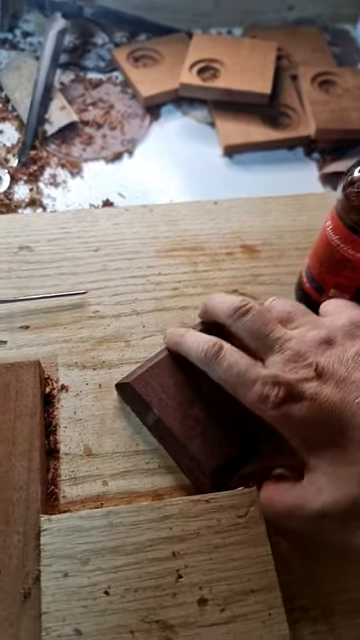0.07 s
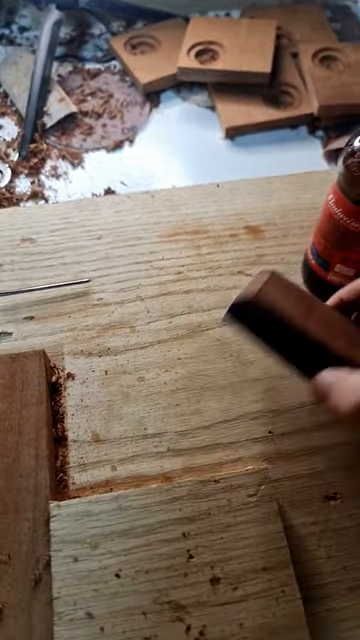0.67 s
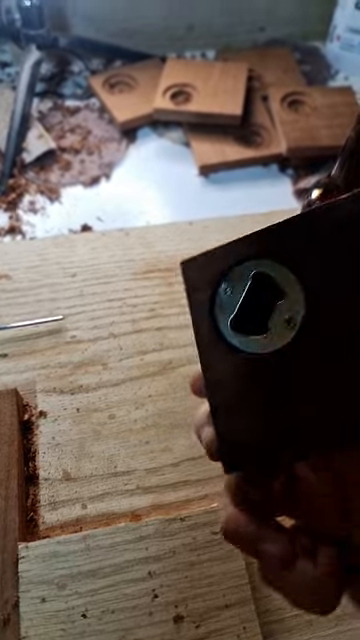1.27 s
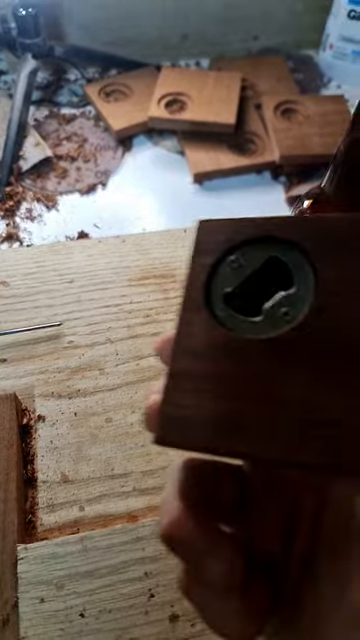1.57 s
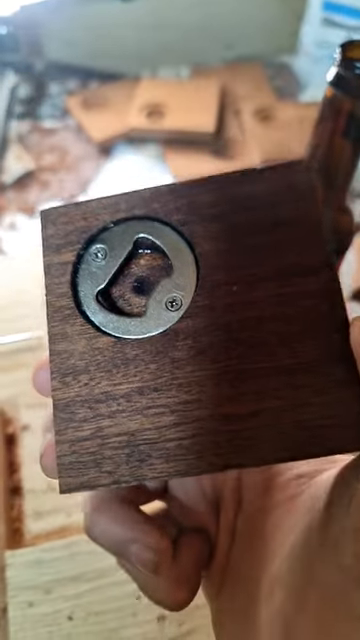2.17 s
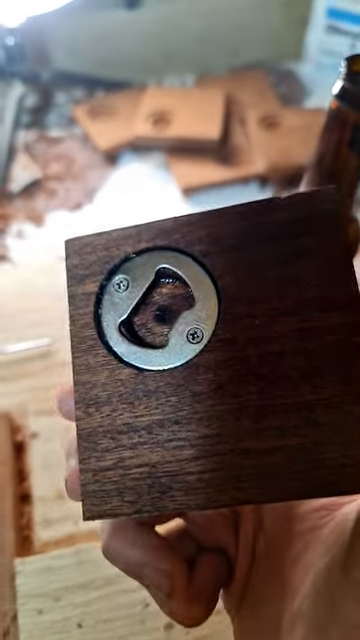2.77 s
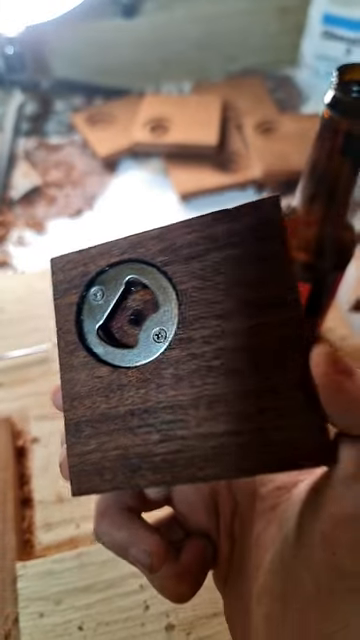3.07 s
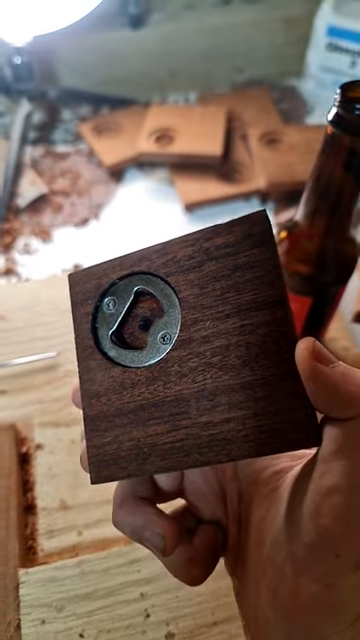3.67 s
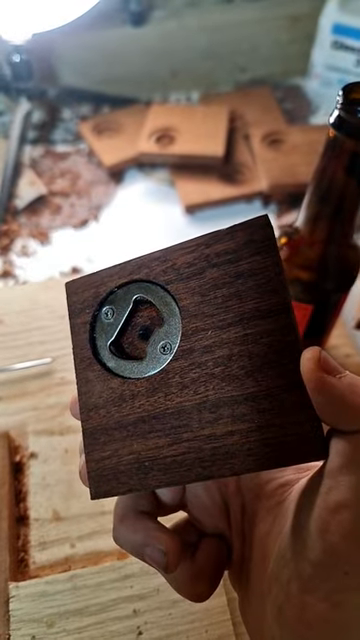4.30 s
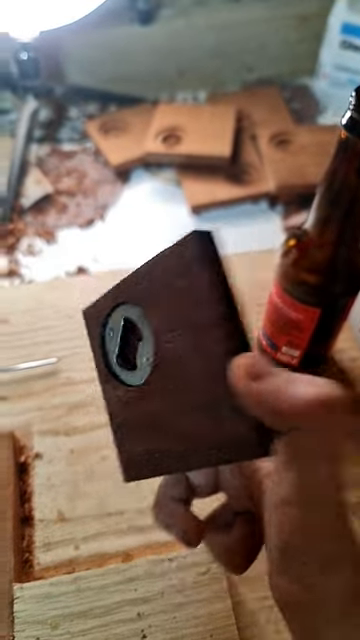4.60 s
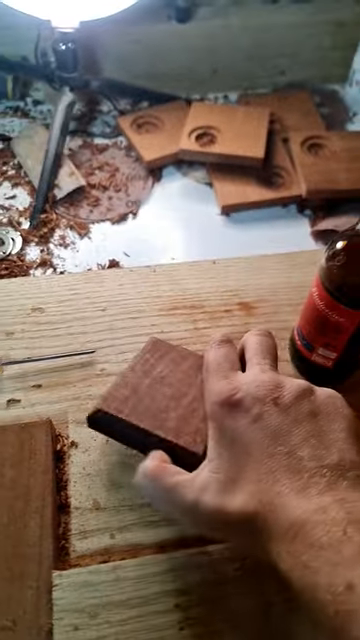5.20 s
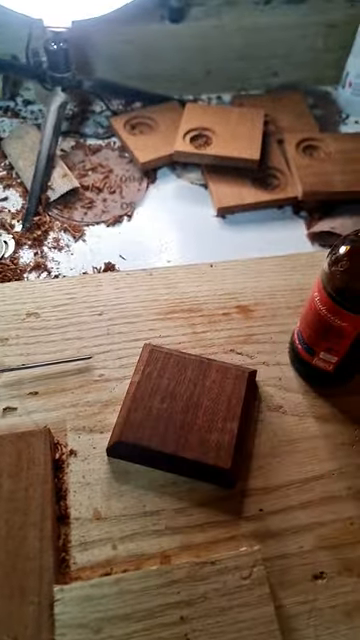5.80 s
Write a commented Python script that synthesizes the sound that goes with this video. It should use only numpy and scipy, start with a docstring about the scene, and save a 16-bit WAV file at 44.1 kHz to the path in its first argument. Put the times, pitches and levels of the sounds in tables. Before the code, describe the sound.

Wood drags briefly on a bench, followed by muffled microphone handling bumps and, near the end, two quick wooden knocks.

```python
"""A gritty scrape comes first: a wooden coaster is dragged over a workbench. It is lifted, turned in
softly brushing fingers and set down edge first with a few clacks. Friction and impact excite the
modes of coaster and bench, which reach a phone's open left port with the small workshop's low rumble.
The hand holding the phone covers the right port, which hears mainly that hand: tremor, soft bumps,
muffled skin rubs and ticks of the case."""
import sys
import numpy as np
from scipy import signal
from scipy.fft import rfft, irfft
from scipy.io import wavfile
from scipy.ndimage import map_coordinates

SR = 44100
rng = np.random.default_rng(int(sys.argv[2]) if len(sys.argv) > 2 else 0)


def store_pcm(level_fs):
    """Save levels as 16-bit WAV."""
    pcm = np.round(np.clip(level_fs, -1, 1) * 32767).astype(np.int16)
    wavfile.write(sys.argv[1], SR, np.atleast_2d(pcm).T)


N = 257984
TIME = np.arange(N) / SR

# modes of the coaster against the bench top: f/Hz, relative level/dB, T60/s
COASTER_MODES = [(599, -10, 0.057), (659, -1, 0.048), (716, 1.5, 0.047), (1017, -3, 0.053),
                 (1152, -0.5, 0.044), (1255, -15, 0.087), (1333, -9.5, 0.09), (1855, -21, 0.065),
                 (2110, -26, 0.062), (3010, -26, 0.1), (3513, -20, 0.067), (5010, -19, 0.1)]
# modes of the heavy bench: f/Hz, relative level/dB, T60/s
BENCH_MODES = [(55.4, 0.5, 0.82), (118, -25, 0.071), (173.4, 5, 0.16), (222.4, -7.5, 0.16),
               (267.7, 4.5, 0.15), (308, 9, 0.083), (393, -3.5, 0.092)]
# shifts of the grip on the phone: t/s, peak level/dB, push length/s
GRIP_SHIFTS = [(0.111, -26.5, 0.007), (0.256, -29.5, 0.0073), (0.293, -29.5, 0.012), (0.383, -29.5, 0.0031),
               (0.635, -30, 0.0066), (1.314, -27.5, 0.0086), (1.409, -23.5, 0.0091), (1.77, -23.5, 0.0046),
               (1.9, -25.5, 0.0081), (2.216, -29.5, 0.0092), (2.288, -26, 0.0078), (5.056, -21.5, 0.0084),
               (5.268, -34, 0.0062), (5.784, -25.5, 0.0031)]


def knocks(crack_t60=0.15, bench_rise_s=0.01, edge_t60=0.013, edge_rise_s=0.00037):
    """Impact excitation: coaster and edge ring, dust is crushed, the heavy bench responds later."""
    # the coaster rocks at pick-up; later it lands on an edge, tips and settles: t/s, clack level/dB,
    # corner f/Hz, bench level/dB, crack level/dB, edge f/Hz, edge level/dB, pitch ratio of the wood
    impacts = [(0.4577, -52, 1200, -62, -45.5, 1150, -37.5, 1),
               (0.4635, -52, 800, -58, -51, 1160, -39, 0.91), (0.5012, -61, 1710, -49.5, -53, 1600, -39, 1),
               (5.1570, -27.5, 1860, -41, -32, 2060, -36.5, 1),
               (5.3271, -29.5, 1045, -52, -40.5, 1770, -33.5, 0.99),
               (5.3479, -55, 1140, -54, -52, 1710, -41.5, 0.91),
               (5.3649, -41.5, 1150, -60, -41, 1570, -41, 0.98),
               (5.3681, -26, 410, -41.5, -51, 1100, -41.5, .85),
               (5.3757, -37.5, 385, -56, -66, 1270, -51, 0.71),
               (5.3885, -32, 225, -55, -62, 800, -50.5, .5),
               (5.3925, -35.5, 270, -46.5, -65, 595, -43, 0.573)]
    # spectrum of wood cracking on dusty wood: f/Hz, relative level/dB
    crack_spectrum = [(100, -8), (300, 13), (420, 6), (600, 13), (1300, 2.5), (1600, -15), (2100, -11.5),
                      (2600, -16), (3400, -17), (4300, -24), (8000, -21.5), (10000, -36), (16000, -37)]
    out, t = np.zeros(N), TIME[:SR // 2]
    bench = ring(BENCH_MODES) * (1 - np.exp(-t / bench_rise_s))
    for s, clack_db, corner_hz, bench_db, crack_db, edge_hz, edge_db, pitch in impacts:
        wood = ring([(hz * pitch, db, t60) for hz, db, t60 in COASTER_MODES], together=True)
        clack = lowpass(wood, corner_hz)  # a flatter, softer contact reaches fewer high modes
        add(out, s, undb(clack_db) * clack + undb(bench_db) * bench)
        add(out, s, ring([(edge_hz, edge_db, edge_t60)]) * (1 - np.exp(-t / edge_rise_s)))
        add(out, s, undb(crack_db) * burst(crack_spectrum, crack_t60, rise_s=0.00042))
    return out


def drag(grit_db=7, board_db=8, bench_db=-13, sing_db=-1, tip_s=5.19, tip_db=-76.5):
    """Roughness excitation: the sliding edge catches on the grain, hissing and driving the wood."""
    # surges of the slide: t/s, relative hiss level/dB, relative body level/dB
    surges = [(0.192, -86, -72), (0.204, -72.5, -72), (0.228, -75, -75), (0.25, -69, -67),
              (0.275, -68, -62.5), (0.303, -74.5, -67), (0.33, -65, -63), (0.368, -66.5, -65),
              (0.387, -58, -55), (0.407, -59.5, -56.5), (0.435, -64.5, -57.5), (0.462, -64.5, -55),
              (0.488, -65, -66), (0.504, -62.5, -55), (0.535, -68, -69), (0.56, -74, -74), (0.61, -80, -84)]
    # spectrum of dust and grain under the edge: f/Hz, relative level/dB
    grit_spectrum = [(100, -31), (280, -19), (700, -13), (1300, 10.5), (1700, -3.5), (2200, 2),
                     (3200, -2.5), (4500, -2.5), (5700, -4.5), (8300, -4.5), (10000, -15), (13000, -12),
                     (16000, -11.5)]
    # high modes of the rubbed coaster: f/Hz, relative level/dB, T60/s
    high_modes = [(2825, 8, 0.024), (3000, 8, 0.04), (5080, -1, 0.075), (6430, -4, 0.013),
                  (8130, -9, 0.013)]
    times, hiss_db, body_db = np.transpose(surges)
    moving = (TIME > times[0]) * (TIME < times[-1])
    slide, press = (undb(np.interp(TIME, times, db)) * moving for db in (hiss_db, body_db))
    add(slide, tip_s, undb(tip_db) * stroke(length_s=0.15))  # the edge rubs as the coaster tips
    catches = grains(N, per_s=4500)
    body = lowpass(ring(COASTER_MODES, together=True), 1040) + undb(bench_db) * ring(BENCH_MODES)
    board = resonate(catches, body)
    sing = resonate(catches, ring(high_modes))
    surface = undb(grit_db) * colour(catches, grit_spectrum) + undb(sing_db) * sing
    judder = waver(per_s=190, depth_db=0.86)  # ridges of the grain
    return (slide * surface + undb(board_db) * press * board) * judder


def slips(q=14):
    """Stick-slip: the gripping edge chatters at a resonance whose pitch glides as the coaster tilts."""
    # spells of chatter: t/s, length/s, start f/Hz, end f/Hz, level/dB
    spells = [(0, 0.21, 668, 654, -73.5), (0, 0.394, 4980, 5050, -78), (0, 0.35, 8200, 7880, -74.5),
              (0.191, 0.046, 1273, 1176, -64), (0.233, 0.071, 678, 629, -53), (0.311, 0.051, 674, 652, -55),
              (0.372, 0.085, 681, 694, -53), (0.444, 0.12, 301, 299.5, -55),
              (0.471, 0.098, 1454, 1810, -59), (5.197, 0.15, 5090, 5040, -76.5),
              (5.169, 0.15, 8050, 8000, -80)]
    out = np.zeros(N)
    for s, length, start_hz, end_hz, db in spells:
        envelope = stroke(length)
        catches = grains(SR, per_s=3000, spread_db=-2)
        resonance = signal.lfilter(*signal.iirpeak(start_hz, q, fs=SR), catches)
        chatter = lowpass(resonance, 2 * start_hz)
        read_position = SR // 4 + np.cumsum(np.linspace(1, end_hz / start_hz, len(envelope)))
        add(out, s, undb(db) * envelope * unit(map_coordinates(chatter, [read_position])))
    return out


def rolls(corner_hz=520):
    """Forced vibration: slow, heavy contact drives mainly the low modes of coaster and bench."""
    # rolling contacts: t/s, length/s, coaster level/dB, bench level/dB
    contacts = [(0, 0.084, -76, -63.5), (0.57, 0.1, -82, -67), (5.22, 0.14, -64.5, -61),
                (5.45, 0.14, -82, -71)]
    out = np.zeros(N)
    wood, bench = lowpass(ring(COASTER_MODES), corner_hz), ring(BENCH_MODES)
    for s, length, wood_db, bench_db in contacts:
        envelope = stroke(length)
        for response, db in ((wood, wood_db), (bench, bench_db)):
            drone = signal.fftconvolve(grains(SR, per_s=1500), response, "valid")
            add(out, s, undb(db) * envelope * unit(drone[:len(envelope)]))
    return out


def brush(board_db=-6, bench_db=-6, lift_s=1.0, release_s=0.069, resting_db=-88, steepness=0.59):
    """Friction noise: skin and sleeve hiss with hand speed, and stir the wood until the lift."""
    # the hand takes hold, lifts, turns, tilts, lowers, lets go: t/s of top speed, half width/s, level/dB
    moves = [(.15, 0.2, -72.5), (0.648, 0.032, -64), (0.698, 0.027, -68), (1.15, 0.34, -78.5),
             (1.32, 0.016, -89), (1.44, 0.028, -72.5), (1.85, 0.33, -75), (3.12, 0.17, -79.5),
             (4.7, 0.063, -79.5), (4.85, 0.03, -75), (5.05, 0.092, -67.5), (5.62, 0.021, -73),
             (5.79, 0.096, -64)]
    # spectrum of brushing skin and sleeve: f/Hz, relative level/dB
    spectrum = [(150, -1), (400, 1.5), (1100, 4), (1600, 3), (3300, 0), (5000, 1), (6300, 2), (8200, 1),
                (10000, -5.5), (13000, -3), (16000, -14)]
    hiss = colour(grains(N, per_s=14000, spread_db=-0.5), spectrum)
    body = lowpass(ring(COASTER_MODES), 570) + undb(bench_db) * ring(BENCH_MODES)
    board = resonate(rng.standard_normal(N), body)
    touching = np.clip((lift_s - TIME) / release_s, 0, 1)
    bells = (undb(db) / (1 + ((TIME - s) / width) ** 2) ** steepness for s, width, db in moves)
    speed_gain = np.sqrt(sum(bell ** 2 for bell in bells) + undb(resting_db) ** 2)
    return speed_gain * waver(per_s=26, depth_db=0.8) * (hiss + undb(board_db) * touching * board)


def bumps(swing_hz=55.6, reference_push_s=0.0072, stiffening=0.14, t60=0.095):
    """Damped mass on a spring: a push swings the phone in the hand, faster if short and tight."""
    out, t = np.zeros(N), TIME[:SR // 4]
    for s, db, push_s in GRIP_SHIFTS:
        hz = swing_hz * (reference_push_s / push_s) ** stiffening
        response = np.sin(2 * np.pi * hz * t) * undb(-60 * t / t60)
        push = np.hanning(int(2 * push_s * SR) + 3)
        swing = np.gradient(signal.fftconvolve(response, push))
        add(out, s, undb(db) * swing / np.abs(swing).max())
    return out


def rubs(ramp_s=0.005, fade_db=15, shift_s=0.057, shift_db=-41):
    """Stick-slip of skin on the case, also at each shift of the grip, muffled by the hand itself."""
    # rubs over the covered port: t/s, length/s, level/dB
    skin_rubs = [(0.374, 0.17, -48), (0.494, 0.072, -41), (0.541, 0.086, -45), (0.63, 0.12, -44.5),
                 (0.745, 0.14, -55.5), (0.859, 0.046, -54), (1.766, 0.037, -54), (1.912, 0.14, -49),
                 (1.997, 0.093, -49.5), (2.278, 0.21, -53), (2.48, 0.23, -59.5), (5.051, 0.023, -43)]
    # spectrum of muffled skin friction: f/Hz, relative level/dB
    spectrum = [(60, -2.5), (150, 10.5), (250, 3), (400, -5), (550, -15), (750, -23), (1100, -35.5),
                (2000, -43), (5000, -78)]
    pressure = np.zeros(N)
    for s, length, db in skin_rubs:
        t = TIME[:int(length * SR)]
        ramps = np.minimum(np.minimum(t, length - t) / ramp_s, 1)
        add(pressure, s, undb(db - fade_db * t / length) * ramps)
    for s, db, _ in GRIP_SHIFTS:
        add(pressure, s, undb(db + shift_db) * stroke(shift_s))
    return pressure * colour(grains(N, per_s=2000, spread_db=2), spectrum)


def case_ticks(thud_hz=95, thud_t60=0.056, snap_db=-25, snap_t60=0.004, muffle_hz=1900):
    """Sudden release of strain: the case gives way with a tiny snap and a thud, muffled by the hand."""
    # ticks of the gripped case: t/s, level/dB
    ticks = [(1.994, -51), (2.4899, -38), (2.6749, -36)]
    out = np.zeros(N)
    snap = undb(snap_db - 60 * TIME[:SR // 2] / snap_t60)
    tick = lowpass(ring([(thud_hz, 0, thud_t60)]) + snap, muffle_hz)
    for s, db in ticks:
        add(out, s, -undb(db) * tick)
    return out


def tremor(gain_db=9.5):
    """Structure-borne sound: muscles of the holding hand tense in small surges and rumble."""
    # strength of the tremor: t/s, relative level/dB
    strength = [(0.0, -57), (0.85, -48.5), (1.51, -54), (2.08, -47), (3.75, -54), (4.4, -51), (5.69, -53.5),
                (5.85, -47)]
    # its spectrum at the covered port: f/Hz, relative level/dB
    spectrum = [(10, -13), (20, -15), (35, -3), (58, 3), (80, -10), (120, -15.5), (200, -30), (320, -41),
                (600, -71.5)]
    envelope = undb(gain_db + np.interp(TIME, *np.transpose(strength)))
    return envelope * waver(per_s=12, depth_db=1.5) * noise(spectrum)


def workshop(x, wet_db=-16.5, low_t60=0.26, high_t60=0.2, split_hz=800, wall_s=0.014, wall_db=-15):
    """Reflection and scattering: a near wall answers; clutter adds a tail whose lows last longest."""
    t = TIME[:SR // 2]
    scatter = rng.standard_normal(len(t))
    low = signal.sosfiltfilt(signal.butter(2, split_hz, fs=SR, output="sos"), scatter)
    tail = low * undb(-60 * t / low_t60) + (scatter - low) * undb(-60 * t / high_t60)
    tail *= t > 0.0045  # travel time of the first scattered sound
    reverberation = signal.fftconvolve(x, tail / np.sqrt(np.sum(tail ** 2)))[:N]
    wall = np.interp(TIME - wall_s, TIME, x)
    return x + undb(wall_db) * wall + undb(wet_db) * reverberation


def rumble(level_db=-62):
    """Ambient noise: the workshop's low rumble, its amplitude modulated at random."""
    # spectrum of the rumble: f/Hz, relative level/dB
    spectrum = [(10, -24.5), (20, -10.5), (35, -4.5), (56, 6.5), (80, -15.5), (110, -23), (160, -14.5),
                (210, -28), (310, -26.5), (420, -44.5), (600, -36.5), (1500, -63.5)]
    return undb(level_db) * waver(per_s=34, depth_db=2.5) * noise(spectrum)


def microphone_hiss(open_db=-78.5, covered_db=-74.5):
    """Self-noise: each microphone adds its own steady hiss; returns left and right."""
    # hiss spectra of the open and the covered port: f/Hz, relative level/dB
    open_spectrum = [(100, 2.5), (500, 7.5), (1000, -3), (2500, -5), (5000, -23), (7000, -5.5), (7650, 5.5),
                     (8300, -1.5), (10000, -0.5), (13000, -5), (16000, 3)]
    covered_spectrum = [(100, 22), (1000, 0), (2500, -3.5), (5000, -7), (7600, -5), (11000, -4),
                        (13000, 5.5), (16000, -7.5)]
    return np.array([undb(open_db) * noise(open_spectrum), undb(covered_db) * noise(covered_spectrum)])


def ring(modes, together=False):
    """Modal superposition: damped sines start in phase if together, else with alternating signs."""
    t = TIME[:SR // 2]
    sign = 1 if together else -1
    return sum(sign ** k * undb(db - 60 * t / t60) * np.sin(2 * np.pi * hz * t)
               for k, (hz, db, t60) in enumerate(modes))


def resonate(force, response):
    """Convolution of a force with an impulse response, at rms 1."""
    return unit(signal.fftconvolve(force, response)[:N])


def grains(count, per_s, spread_db=0):
    """Shot noise: tiny catches of a rough surface, random in time and size."""
    hit = rng.random(count) < per_s / SR
    return hit * rng.standard_normal(count) * undb(spread_db * np.minimum(rng.exponential(size=count), 4))


def burst(spectrum, t60, rise_s):
    """Coloured noise with a fast rise and exponential decay."""
    t = TIME[:SR // 2]
    return colour(rng.standard_normal(len(t)), spectrum) * undb(-60 * t / t60) * (1 - np.exp(-t / rise_s))


def noise(spectrum):
    """Stationary coloured noise for the whole scene."""
    return colour(rng.standard_normal(N), spectrum)


def colour(x, spectrum):
    """Spectral shaping by (f/Hz, level/dB) points, at rms 1."""
    hz, db = np.transpose(spectrum)
    f = np.maximum(np.fft.rfftfreq(len(x), 1 / SR), 1)
    gain = undb(np.interp(np.log(f), np.log(hz), db))
    return unit(irfft(rfft(x) * gain, len(x)))


def lowpass(x, corner_hz):
    """Second-order roll-off."""
    return signal.sosfilt(signal.butter(2, corner_hz, fs=SR, output="sos"), x)


def waver(per_s, depth_db):
    """Random amplitude modulation: a gain that wanders."""
    knots = np.arange(0, TIME[-1] + 1, 1 / per_s)
    return undb(depth_db * np.interp(TIME, knots, rng.standard_normal(len(knots))))


def stroke(length_s):
    """Tapered envelope of a short movement: it takes hold, carries on and lets go."""
    return signal.windows.tukey(int(length_s * SR), 0.7)


def add(track, s, sound):
    """Superpose a sound on a track at time s."""
    i = max(int(s * SR), 0)
    track[i:i + len(sound)] += sound[:max(N - i, 0)]


def undb(db):
    """Level to amplitude ratio."""
    return 10 ** (np.asarray(db) / 20)


def unit(x):
    """Normalise to rms 1."""
    return x / np.sqrt(np.mean(x ** 2) + 1e-20)


def scene(leak_db=-35, leak_hz=800, bump_open_db=-29):
    """Two paths: airborne sound to the open port, hand-borne to the covered one, with slight crosstalk."""
    air = workshop(knocks() + drag() + rolls() + slips() + brush())
    bump = bumps()
    leak = undb(leak_db) * lowpass(air, leak_hz)
    left = air + undb(bump_open_db) * bump + rumble()
    right = leak + bump + rubs() + case_ticks() + tremor()
    return np.array([left, right]) + microphone_hiss()


def record(dry, top_hz=15250):
    """Band limiting: the phone's steep low-pass cuts the highest treble."""
    return signal.sosfilt(signal.ellip(10, 0.1, 80, top_hz, fs=SR, output="sos"), dry)


dry = scene()
out = record(dry)
store_pcm(out)
```